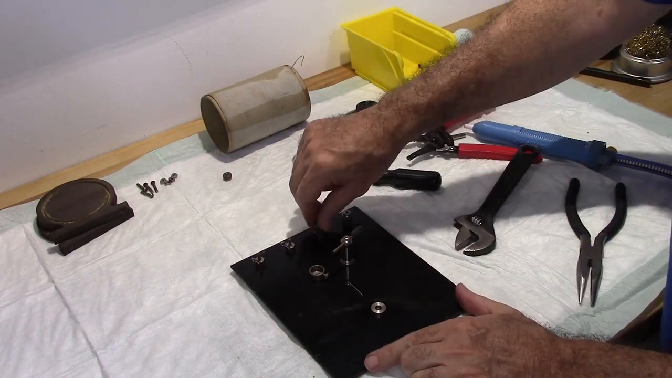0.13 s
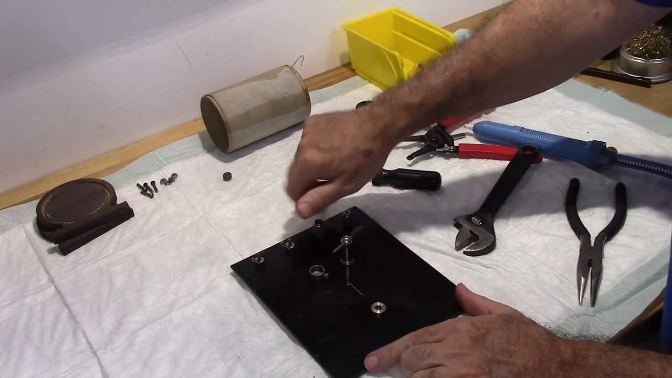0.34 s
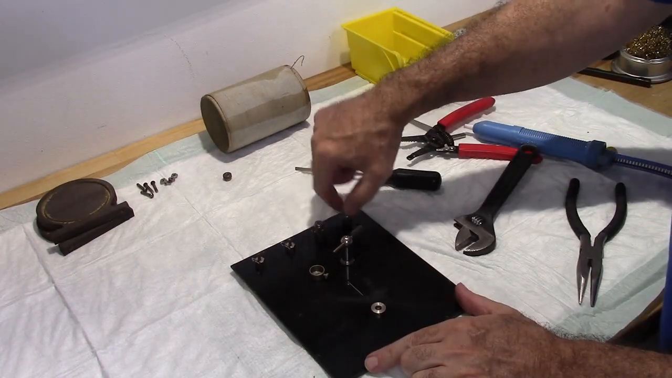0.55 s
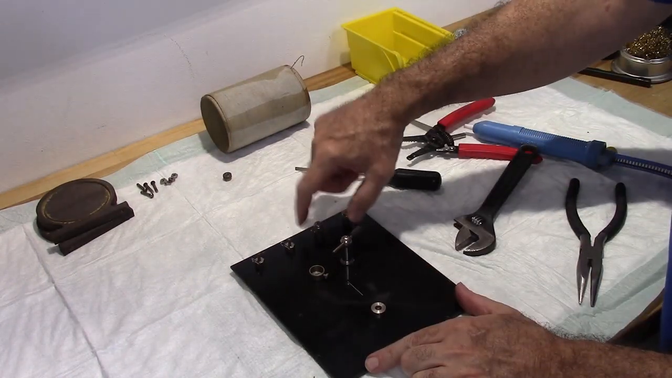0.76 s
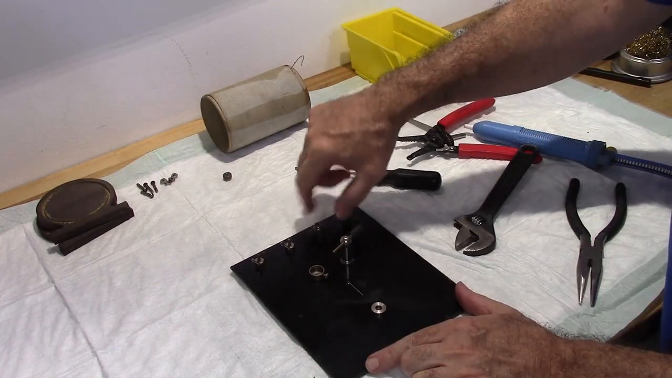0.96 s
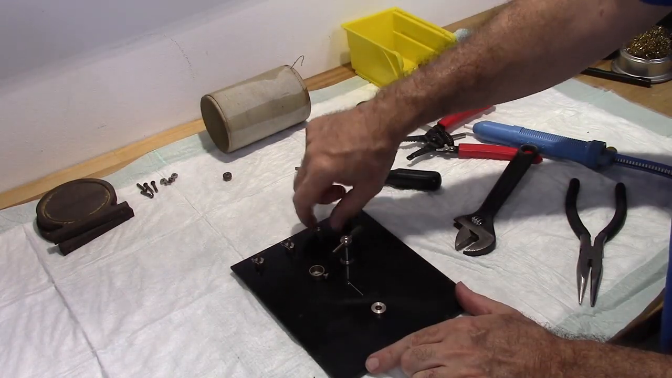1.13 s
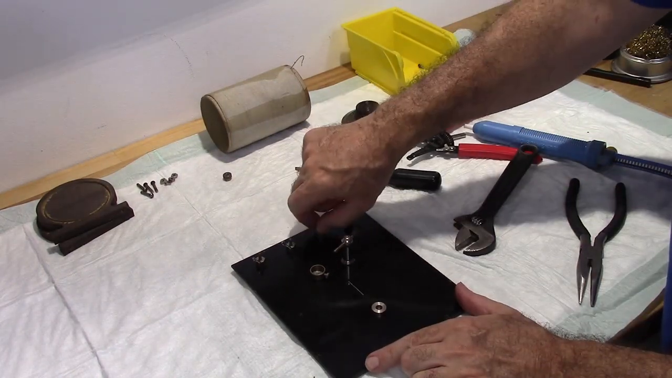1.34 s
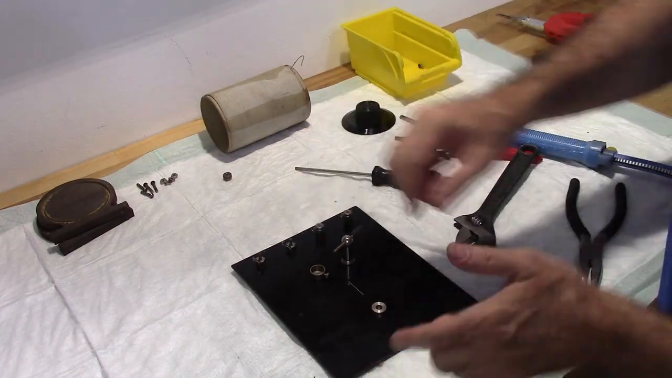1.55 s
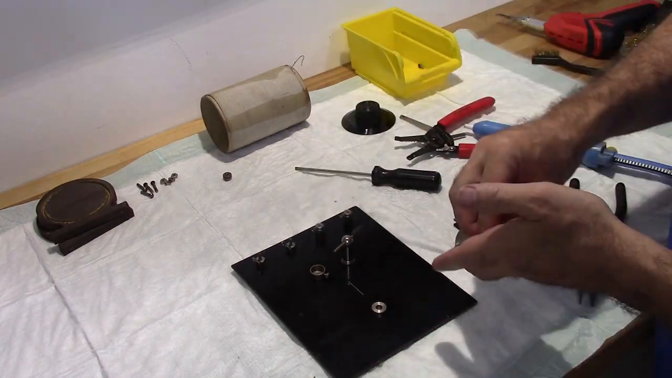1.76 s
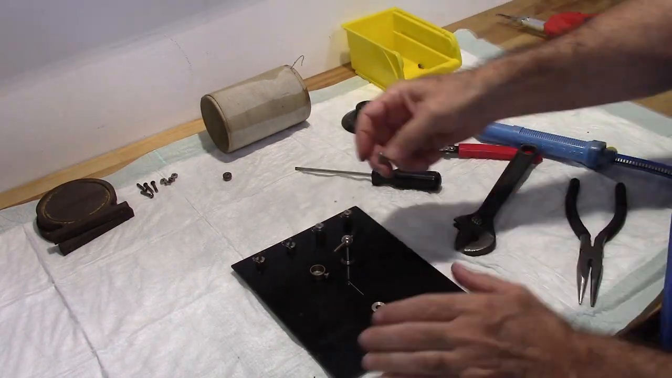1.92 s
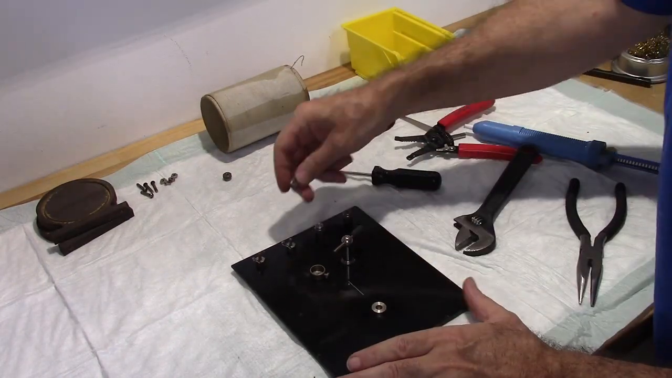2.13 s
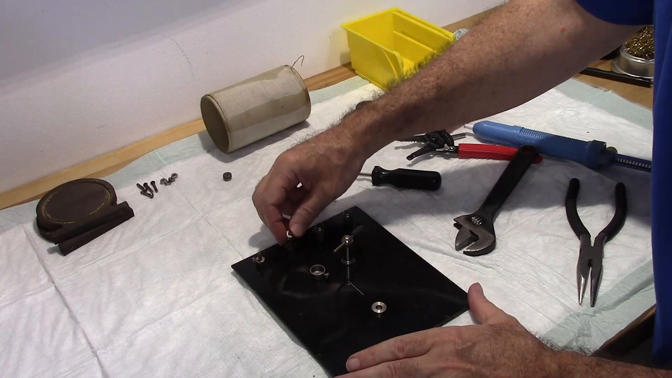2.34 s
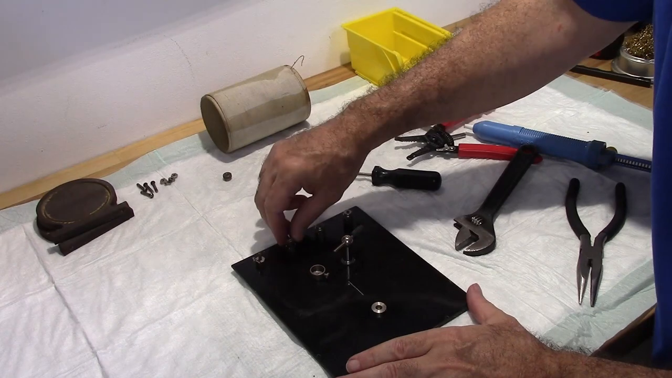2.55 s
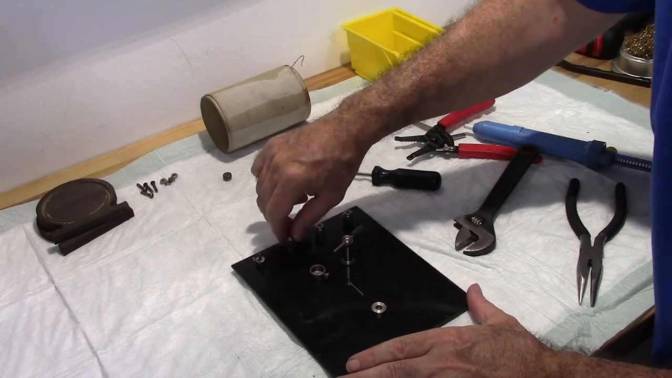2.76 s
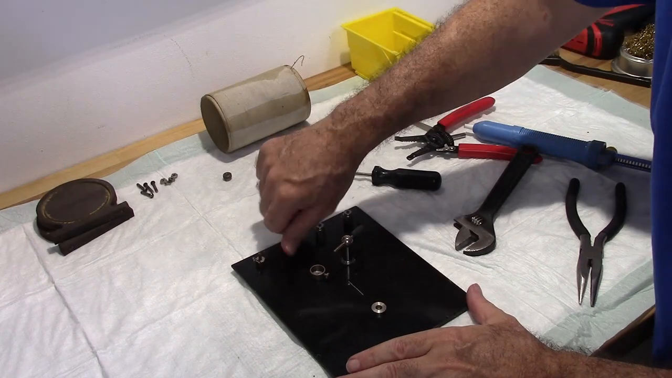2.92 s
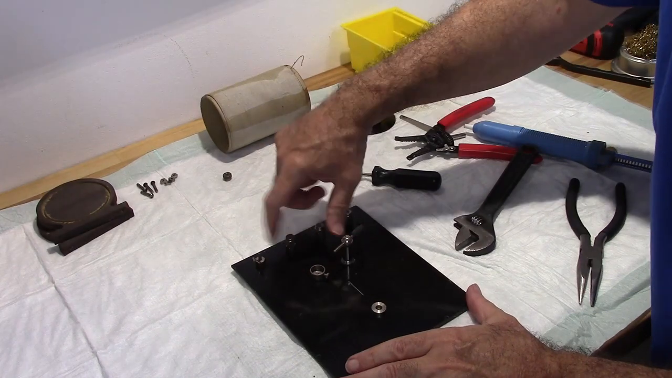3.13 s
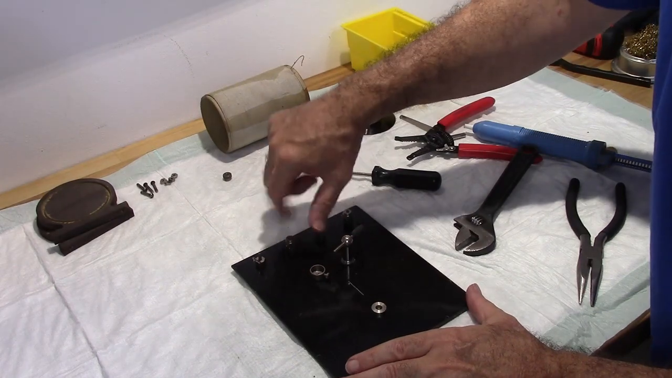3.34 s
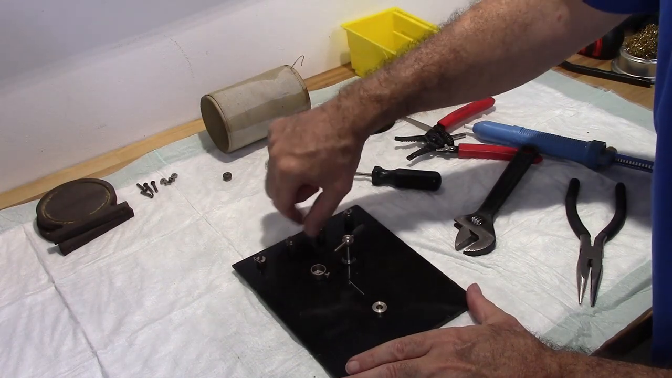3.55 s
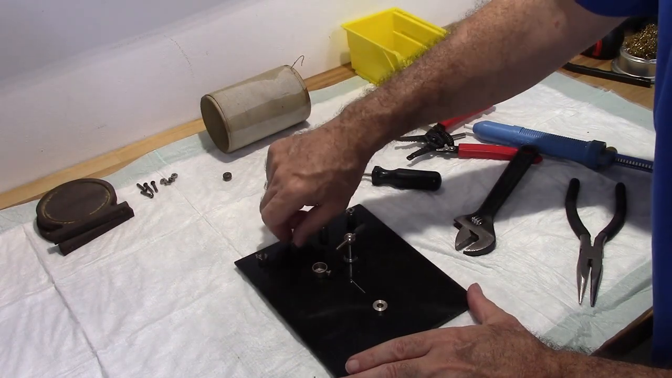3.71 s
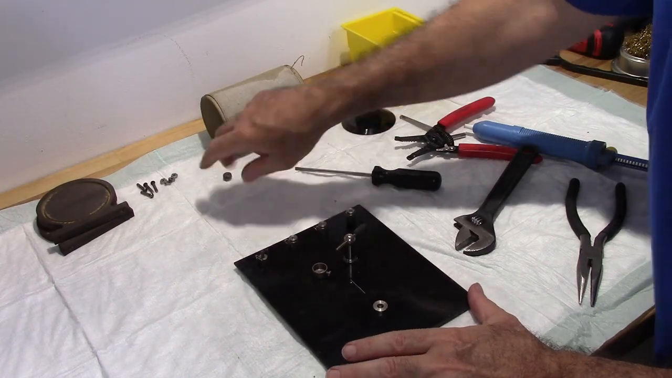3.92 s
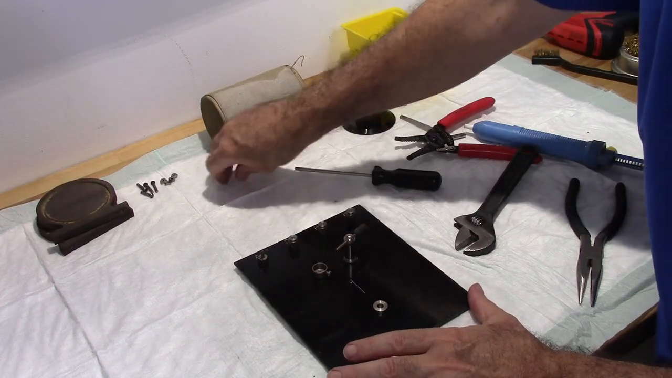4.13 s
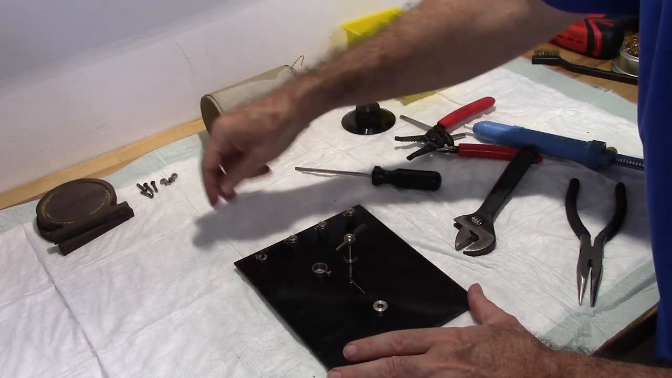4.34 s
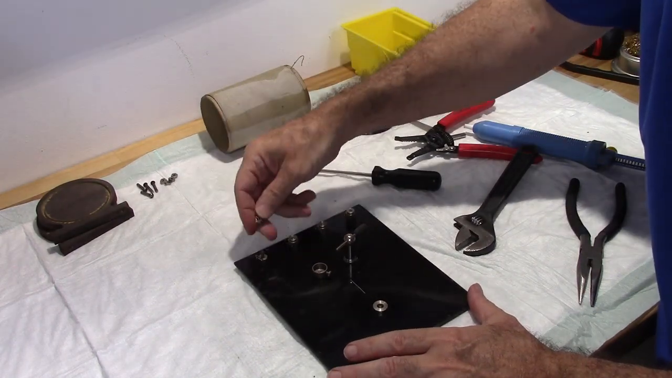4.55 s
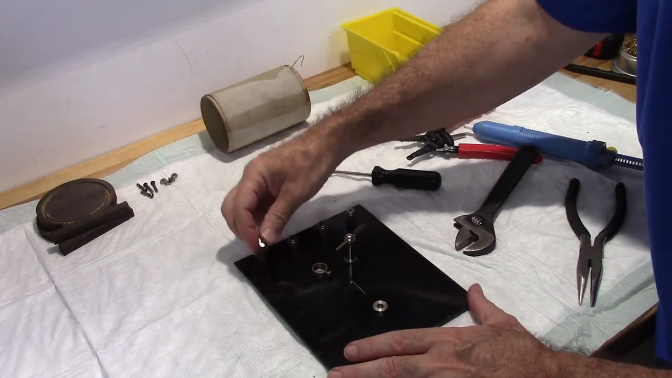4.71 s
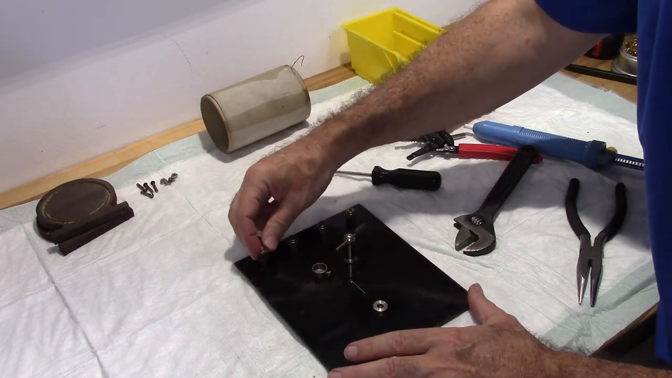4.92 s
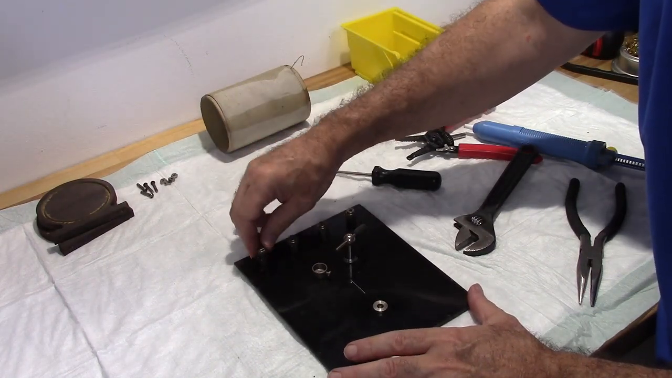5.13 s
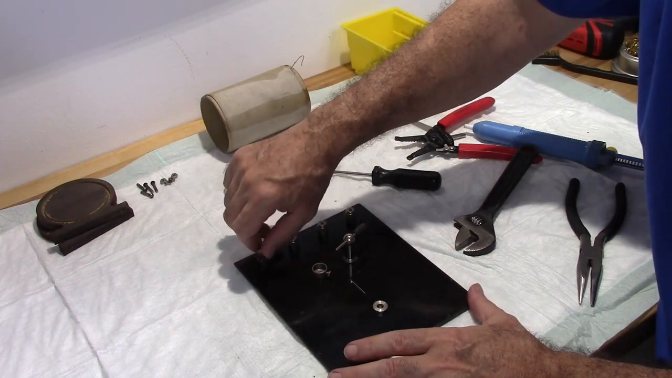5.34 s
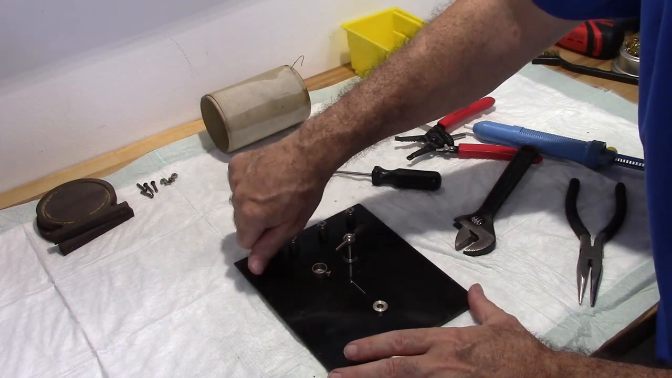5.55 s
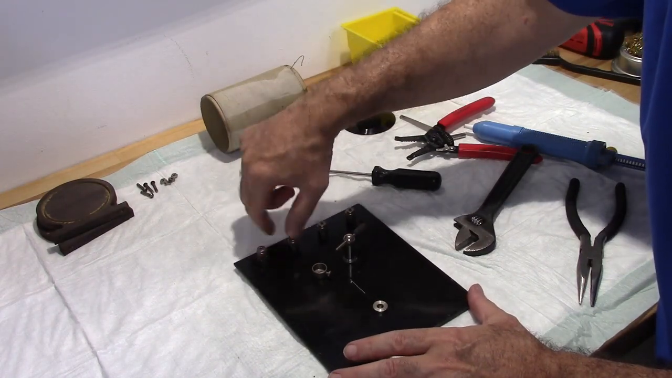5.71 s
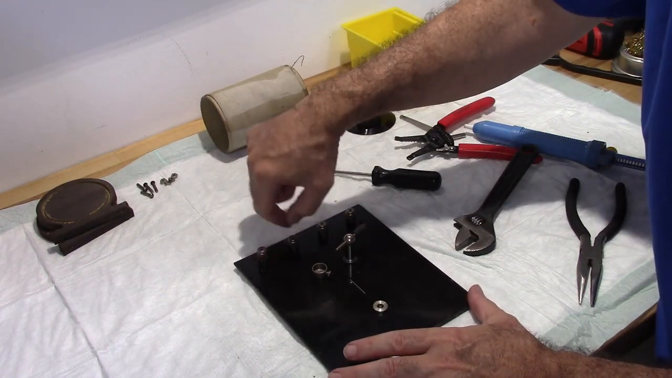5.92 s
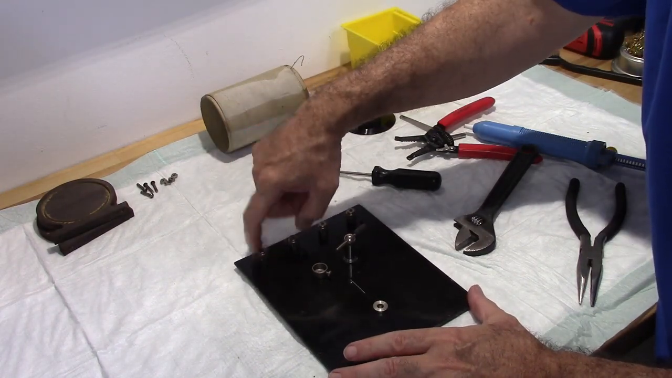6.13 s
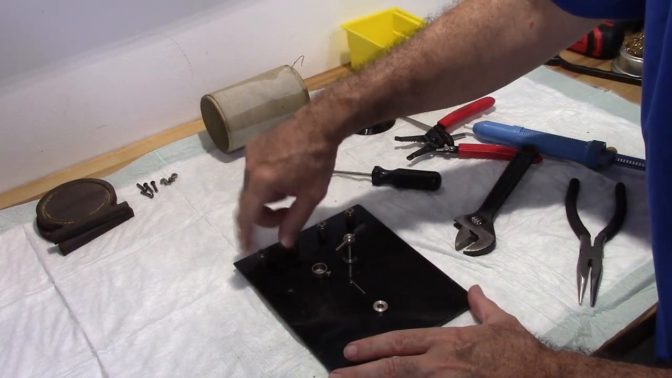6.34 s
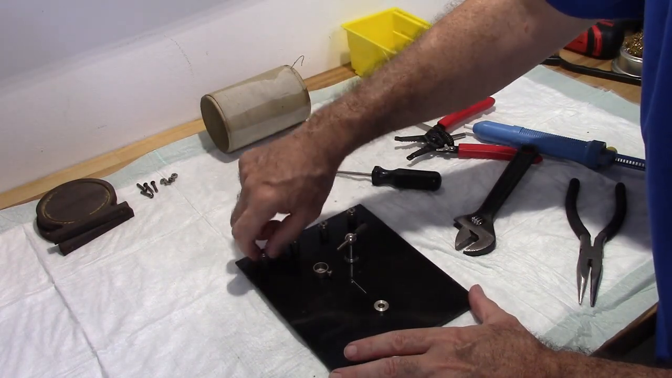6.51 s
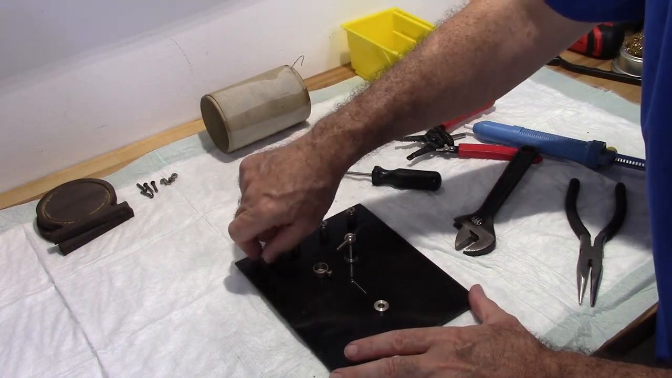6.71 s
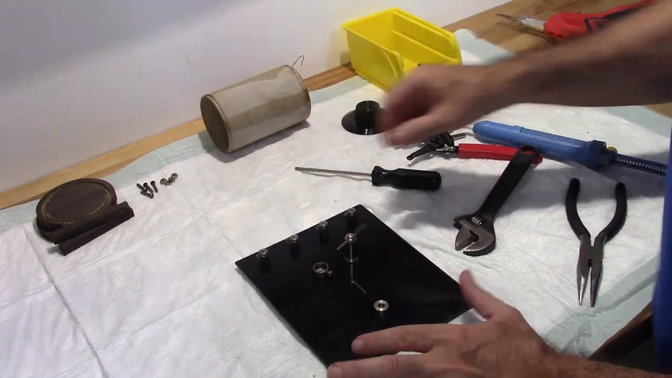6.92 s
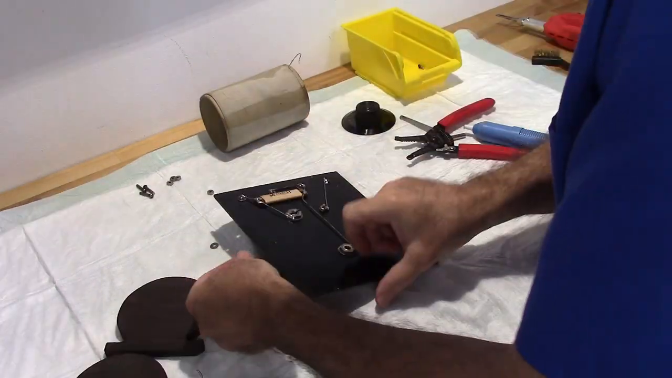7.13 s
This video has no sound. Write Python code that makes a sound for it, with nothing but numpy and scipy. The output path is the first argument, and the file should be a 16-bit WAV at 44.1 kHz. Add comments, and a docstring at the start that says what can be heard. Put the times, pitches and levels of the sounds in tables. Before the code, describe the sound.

Close fingernail ticks and brief bright rattles of little nuts spinning on their threads, in three bursts with light handling taps between.

```python
"""Light finger touches, then small nuts flicked down their screws, close to a stereo microphone.
The screws stand on a plastic plate lying on a padded workbench. Each flick is a tick of the
fingernail, a short spin on the thread and a rattle of quick contacts that ring in plate and nut.
More touches, soft bumps of the bench, sleeve rustle and the hush of a small room fill the pauses."""
import sys
import numpy as np
from scipy import signal
from scipy.io import wavfile

SR = 44100
rng = np.random.default_rng(int(sys.argv[2]) if len(sys.argv) > 2 else 0)


def transcribe(u):
    """Save the signal u as a 16-bit wav file named by the first command-line argument.

    u: samples, shape (n,) or (channels, n), limited to [-1, 1]; the rate is SR.
    q: integer samples, one column per channel.
    """
    v = np.clip(np.atleast_2d(u).T, -1, 1)
    q = np.round(v * 32767).astype(np.int16)
    wavfile.write(sys.argv[1], SR, q)


N = 320607

# fingers touch parts and pad: t/s of peak, level/dB, rise/(dB per 10 ms), brightness/dB, plate f/Hz
TOUCHES = [(0.014, -40.5, 45, -8, 1270), (0.1522, -49, 12, -13.5, 1300), (0.1985, -52, 16, -20, 1070),
           (0.2305, -48, 50, -26, 1030), (0.3035, -57.5, 6, -11, 1030), (0.679, -38, 40, -4.5, 2200),
           (0.938, -38, 80, 5, 1820), (1.448, -58.5, 25, -18.5, 1670), (1.477, -64, 15, -2, 1680),
           (1.5466, -47, 33, 0.5, 976), (2.038, -64, 12.5, 7.5, 1910), (2.1333, -71, 45, 14, 890),
           (2.67, -64, 29, -9, 1390), (2.705, -61.5, 11, -5, 1400), (2.762, -64, 19, -26, 1450),
           (2.7867, -47, 27, -12.5, 1540), (2.8863, -42, 21, -16, 1694), (2.954, -62.5, 12, -8, 1640),
           (2.977, -58, 6, -9.5, 1610), (3.441, -56, 80, -5, 1670), (3.679, -62, 7.5, -3.5, 980),
           (3.8005, -75.5, 14.5, 9.5, 1440), (3.868, -51.5, 39.5, -28, 1680), (3.9572, -71, 7, -0.5, 1050),
           (5.148, -56, 9.5, -18, 1050), (5.238, -60.5, 14, -18, 1200), (5.285, -64.5, 20.5, -7, 1033),
           (5.3217, -51.5, 14, -18, 1620), (5.361, -50.5, 36.5, -16, 1220), (5.4434, -63.5, 11, -4.5, 1380),
           (5.4703, -57.5, 14, -7.5, 1390), (5.534, -61.5, 10, -9.5, 1490), (5.807, -44, 38, -36, 1280),
           (6.7954, -60, 12, -19, 1280), (6.9049, -60, 28, -6, 1600), (6.9837, -62.5, 5, 1, 1280)]
# nail meets nut and sets it spinning: t/s, tick/dB, brightness/dB, spin/dB, bench bump/dB
NAIL_TICKS = [(0.432, -37, -10, -48, -51), (0.5568, -31.5, -2.7, -40, -39), (0.6845, -32.5, -3.5, -56, -37),
              (0.797, -45, -21, -44, -38), (0.9149, -41, 3, -44.5, -37.5), (1.0419, -41.5, 10, -42.5, -46),
              (2.3729, -37, 4.5, -81.5, -51.5), (3.065, -37, 17, -46.5, -50), (3.1847, -34.5, 15, -44, -51),
              (3.3, -35.5, 5, -42.5, -41.5), (3.419, -32, -3, -50.5, -44), (3.533, -34, 5, -44.5, -47),
              (4.7955, -42.5, -5, -69, -64.5), (5.6861, -61, -12, -45, -43), (5.8115, -32, -4, -39.5, -39),
              (5.917, -48, -45, -54, -47), (6.035, -58, -9, -46.5, -45), (6.15, -37.5, -3, -40.5, -37.5),
              (6.2642, -36.5, -7, -65, -40.5), (6.383, -33, -24, -53, -41.5)]
# the nut chatters on the thread, one row per tick: t/s of peak, level/dB, rise and fall/(dB per 10 ms),
# brightness/dB, plate flex/dB, plate f/Hz, nut f/Hz
RATTLES = [(0.4753, -35.5, 13, 17, -6, -21, 1240, 2530), (0.5818, -33.5, 16, 16, 4, -23, 2030, 2600),
           (0.7097, -25.5, 16.3, 17, 1, -21, 1630, 3200), (0.8306, -24.5, 29, 15.8, 2, -20.5, 1510, 2500),
           (0.9439, -23.5, 46, 14, 3.5, -21, 1820, 2830), (1.0581, -20.5, 58, 19, 1, -25, 1850, 2970),
           (2.4329, -32, 25, 16.3, -10.5, -21, 1640, 3260), (3.109, -32.5, 18, 11.1, 3, -18.5, 1740, 4430),
           (3.216, -28.5, 15.3, 15.4, 3, -19.5, 1760, 3700), (3.33, -26, 23, 14.7, 7, -16.5, 1660, 2480),
           (3.4475, -22.5, 39, 13.5, 7.5, -14, 1650, 2420), (3.5483, -26.5, 36, 24, 1, -33, 1374, 2440),
           (4.843, -31.5, 44.5, 20, -18, -23, 1255, 2570), (5.7175, -38, 10, 14, -13.5, -16, 1340, 2960),
           (5.8346, -36.5, 24, 20, 11, -11, 1400, 3000), (5.9414, -25.5, 23, 16.8, -0.5, -17.5, 1940, 2500),
           (6.0554, -25.5, 41, 16, 7, -12, 1660, 2500), (6.1729, -24, 67, 15.3, 4, -10, 1380, 3100),
           (6.286, -25, 24, 19, 3, -8, 1820, 2630), (6.4091, -26.5, 60, 16.2, -6, -21, 1430, 2640)]


def from_db(db):
    """Decibels to gain."""
    return 10 ** (np.asarray(db) / 20)


def unit_rms(x):
    """Scale to rms 1."""
    return x / np.sqrt(np.mean(x ** 2) + 1e-20)


def at_hz(points, hz):
    """Read a curve on a log-frequency axis."""
    freqs, values = np.transpose(points)
    return np.interp(np.log(hz), np.log(freqs), values)


def band(x, low_hz, high_hz, order=2):
    """Butterworth band-pass."""
    sos = signal.butter(order, [low_hz, min(high_hz, .45 * SR)], "band", fs=SR, output="sos")
    return signal.sosfilt(sos, x)


def drift(rate_hz):
    """A slow random wander of rms 1."""
    pole = np.exp(-80 * np.pi * rate_hz / SR)
    slow = signal.lfilter([1], [1, -2 * pole, pole * pole], rng.standard_normal(N // 40 + 2002))[2000:]
    return np.interp(np.arange(N) / 40, np.arange(len(slow)), unit_rms(slow))


def banded_noise(spectrum, flicker_db):
    """Stereo noise of rms 1 in half-octave bands, each with its own level, flicker and width."""
    likeness = [(60, 1), (180, 0.56), (550, 0.66), (1650, 0.19), (4970, 0.32), (15000, 0.82)]   # between the channels: f/Hz, correlation
    out, edges = 0, 22 * 2 ** np.arange(0, 10, .5)
    white = rng.standard_normal((2, 2, N))
    for k, (low, high) in enumerate(zip(edges, edges[1:])):
        hz = np.sqrt(low * high)
        if spectrum[0][0] < hz < spectrum[-1][0]:
            mid, side = band(white[k % 2], low, high)
            alike = at_hz(likeness, hz)
            gain = from_db(at_hz(spectrum, hz) + flicker_db * drift(3.8))
            out = out + gain * (np.sqrt(1 + alike) * mid + np.sqrt(1 - alike) * side * [[1], [-1]])
    return unit_rms(out)


def room_and_sleeves():
    """Low room tone all around the microphone, and the brighter rustle of sleeves."""
    levels = [(0, -60.5, -65.5), (1.3, -61.5, -67), (2.1, -61, -65), (3.75, -62, -66.5), (5.5, -61.5, -67),
              (6.6, -62, -68.5), (7.0, -59.5, -62.5), (7.27, -62.5, -61.5)]   # t/s, room tone/dB, rustle/dB
    room_spectrum = [(15, -51), (25, -23.5), (161, -5.5), (231, -4), (271, -4.5), (413, -4), (447, -2),
                     (616, -10), (1120, -11), (1290, -18), (1520, -22), (3000, -35), (3900, -59.5),
                     (6600, -120)]   # f/Hz, density/dB
    sleeve_spectrum = [(590, -26.5), (1000, -3), (1490, -3), (1640, 0), (2410, -2), (3010, -1.5),
                       (10100, -12.5), (15200, -23.5), (16500, -39)]   # f/Hz, density/dB
    times, room_db, sleeve_db = np.transpose(levels)
    t = np.arange(N) / SR
    room = from_db(np.interp(t, times, room_db)) * banded_noise(room_spectrum, flicker_db=2)
    sleeves = from_db(np.interp(t, times, sleeve_db)) * banded_noise(sleeve_spectrum, flicker_db=.3)
    return room + sleeves


def add_swell(strengths, s, rise, fall, levels_db, hold_s=0.):
    """Shake all five parts with one round-topped swell; rise and fall are in dB per 10 ms."""
    quickness = [.8, 1, 1.05, 1.15, 1.3]   # slope factor per part: the higher it rings, the shorter it answers
    at = np.arange(max(round((s - .12) * SR), 0), min(round((s + hold_s + .15) * SR), N))
    since = at / SR - s
    late = np.maximum(since - hold_s, np.minimum(since, 0))
    rise_db = np.clip(-100 * rise * since, -200, 200)
    fall_db = np.clip(100 * fall * late, -200, 200)
    shape = np.minimum(2 / (from_db(rise_db) + from_db(fall_db)), 1.3)
    strengths[:, at] += from_db(levels_db)[:, None] * shape ** np.array(quickness)[:, None]


def finger_shaking():
    """How hard touches, ticks, spins and rattles shake each part at each moment."""
    # per part (flex, plate, nut, bright ring, top): offset/dB, and share of the brightness it follows
    touch_parts, tick_parts = [-13.5, 0, .9, .5, -10], [-18, -1.5, 1, -.5, -14.5]
    spin_parts, rattle_parts = [-20.5, -3.5, -5, -12, -24.5], [-2.5, -1.5, 3.5, .5, -14]
    follows = np.array([0, .019, .52, .87, 1])
    strengths = np.zeros((5, N))
    for s, db, rise, bright, _ in TOUCHES:
        add_swell(strengths, s, rise, fall=2.1 * rise, levels_db=db + bright * follows + touch_parts)
    for (s, db, bright, spin_db, _), (rattle_s, *_) in zip(NAIL_TICKS, RATTLES):
        add_swell(strengths, s, rise=400, fall=36, levels_db=db + bright * follows + tick_parts)
        # the nut runs freely until it starts to chatter, coloured a little like the tick
        spin_levels = spin_db + .2 * bright * follows + spin_parts
        add_swell(strengths, s, rise=45, fall=28, levels_db=spin_levels, hold_s=rattle_s - s)
    for s, db, rise, fall, bright, flex_db, *_ in RATTLES:
        rattle_levels = db + bright * follows + rattle_parts + [flex_db, 0, 0, 0, 0]
        add_swell(strengths, s, rise, fall, rattle_levels)
    return strengths


def grip_pitches():
    """Each part's favoured f/Hz: plate and nut change at each tick, the plate briefly at a touch."""
    tick_times = np.array(NAIL_TICKS)[:, 0]
    flick = np.maximum(np.searchsorted(tick_times, np.arange(N) / SR) - 1, 0)
    plate_hz, nut_hz = np.array(RATTLES)[flick, -2:].T
    for s, *_, hz in TOUCHES:
        plate_hz[max(round((s - .012) * SR), 0):round((s + .015) * SR)] = hz
    return [590, plate_hz, nut_hz, 7900, 11800]


def ring_part(shaking, favoured_hz, low_hz, high_hz, body_db, lift_db, modes, wander_db):
    """A part rings in modes of wandering level over a broad body; the grip lifts those near one pitch."""
    drive = np.vstack([signal.unit_impulse(N), shaking])   # the impulse gives the part's own gain
    out = from_db(body_db) * drive
    for k, (hz, width_hz, db) in enumerate(modes):
        radius = np.exp(-np.pi * width_hz / SR)
        gain = (1 - radius ** 2) / 2
        feedback = [1, -2 * radius * np.cos(2 * np.pi * hz / SR), radius ** 2]
        mode = signal.lfilter([gain, 0, -gain], feedback, drive + 1e-18)
        closeness = np.exp(-(np.log(hz / favoured_hz) / .09) ** 2)
        mode[1:] *= from_db(lift_db * closeness + wander_db * drift(8.6))
        out += (-1) ** k * from_db(db) * mode
    out = band(out, low_hz, high_hz, order=4)
    return out[1:] / np.sqrt(np.sum(out[0] ** 2))


def nuts_and_plate():
    """Thousands of tiny uneven contacts a second shake the parts; the nut keeps settling afterwards in a fading
    chatter."""
    # the five ringing parts: low f/Hz, high f/Hz, body/dB, lift/dB, modes (f/Hz, width/Hz, level/dB)
    flex = (210, 720, -5.5, 3.1, [(305, 42, -5), (363, 60, -8.5), (466.4, 69, -4.5), (594, 35, 3),
            (672, 43, -7)])
    plate = (950, 2400, -5, 11, [(1140, 79, -4.5), (1144, 45, 0.5), (1433, 100, 0), (1429, 80, 2),
             (1652, 120, -7.5), (1821, 100, -0.5), (1824, 200, -13), (2236, 120, -2)])
    nut = (2000, 5850, -4.5, 4, [(2560, 47, -5.5), (2770, 100, 2), (2958, 150, -1), (3360, 130, 2.5),
           (3650, 250, -6), (4340, 190, 4), (5360, 67, -12.5)])
    bright_ring = (6300, 9900, -0.38, 3, [(6300, 330, -13), (7840, 120, -1), (7920, 300, -1),
                   (8450, 210, 0.5), (8850, 130, -11), (9500, 150, -7), (10300, 300, -13)])
    top = (10800, 13400, -6, 0, [(11800, 500, -6), (12300, 500, -6)])
    settling_tails = [(-6, .2, -23.5), (-11, 0.16, -31.5), (-9.5, 0.13, -19.5), (-18.5, 0.17, -16),
                      (-15.5, 0.065, -18)]   # each part's settling tail: tail/dB, t60/s, stereo side/dB
    contacts_per_s = 8000
    sizes = from_db(5.2 * np.minimum(rng.exponential(1, N), 3.5))
    contacts = unit_rms(sizes * (rng.random(N) < contacts_per_s / SR))
    # one firm click for each nail tick, each touch and the height of each rattle
    contacts[[round(s * SR) for s, *_ in [*NAIL_TICKS, *RATTLES, *TOUCHES]]] = 5.5
    out = np.zeros((2, N))
    parts = zip([flex, plate, nut, bright_ring, top], finger_shaking(), grip_pitches(), settling_tails)
    for part, strength, favoured_hz, (tail_db, t60, side_db) in parts:
        retained = from_db(-120 / (t60 * SR))   # share of the settling energy left after one sample
        energy = signal.lfilter([1 - retained], [1, -retained], strength ** 2 + 1e-18)
        tail = from_db(tail_db) * np.sqrt(energy)
        diffuse = rng.standard_normal((2, N))
        mid = contacts * rng.choice([-1, 1], N) * strength + tail * diffuse[0]
        # reflections reach the two sides of the microphone unalike
        side = from_db(side_db) * (strength + 1.5 * tail) * diffuse[1]
        mid, side = ring_part(np.array([mid, side]), favoured_hz, *part, wander_db=2.5)
        out += mid + side * [[1], [-1]]
    return out


def pings():
    """Dying sines: each touch taps the plate at its own pitch, and a few contacts leave a mode ringing."""
    lingering_modes = [(1.062, 2870, -50, .34), (4.846, 1290, -35.5, 0.093), (5.36, 1385, -46, 0.082),
                       (5.47, 1390, -49.5, 0.14), (6.409, 1240, -25.5, 0.076), (6.411, 2880, -42, 0.053)]   # t/s, f/Hz, level/dB, t60/s
    tap_lift_db, tap_t60_s = 4, .027
    taps = [(s, hz, db + tap_lift_db, tap_t60_s) for s, db, *_, hz in TOUCHES]
    out, t = np.zeros(N + SR), np.arange(SR // 2) / SR
    for s, hz, db, t60 in [*lingering_modes, *taps]:
        out[round(s * SR):][:len(t)] += from_db(db - 60 * t / t60) * np.sin(2 * np.pi * hz * t)
    return out[:N]


def bench_bumps():
    """The padded bench gives a brief low ring just after each tick, and at a few other moments."""
    other_bumps = [(1.252, -52.5, 155), (1.527, -52, 105), (1.68, -50, 146.6), (1.965, -59, 200),
                   (2.43, -47.5, 133), (2.872, -52.5, 195), (3.651, -51, 169.4), (3.692, -40, 155.5),
                   (7.257, -48.5, 178)]   # t/s, level/dB, f/Hz
    bench_hz, lag_s, decay_s = 159, .0033, .004
    flick_bumps = [(s + lag_s, db, bench_hz) for s, *_, db in NAIL_TICKS]
    out, t = np.zeros(N), np.arange(N) / SR
    for s, db, hz in [*other_bumps, *flick_bumps]:
        at = slice(round(s * SR), round((s + .086) * SR))
        age = np.maximum(t[at] - s, 0)
        envelope = age / .0045 * np.exp(-age / decay_s)
        out[at] += from_db(db + 7) * envelope * np.sin(2 * np.pi * hz * age)
    return out


def soft_tones():
    """Three faint short tones swell and fade in the pauses."""
    tones = [(1.396, 0.12, 165.8, -56.5), (4.685, 0.042, 672, -54.5), (6.993, 0.13, 114.4, -58)]   # t/s, length/s, f/Hz, level/dB
    out, t = np.zeros(N), np.arange(N) / SR
    for s, length, hz, db in tones:
        arch = np.sin(np.pi * np.clip((t - s) / length, 0, 1)) ** .49
        out += from_db(db) * arch * np.sin(2 * np.pi * hz * t)
    return out


def scene():
    """The workbench close up, a hair left of centre, over the room tone."""
    background = room_and_sleeves()
    workbench = nuts_and_plate() + pings() + bench_bumps() + soft_tones()
    return workbench * from_db([[.15], [-.15]]) + background


def record(dry):
    """The loudest clicks are softly rounded; deep rumble and extreme treble are cut."""
    ceiling, low_cut_hz, stop_hz = .85, 25, 16800
    rounded = ceiling * np.tanh(dry / ceiling)
    low_cut = signal.butter(1, low_cut_hz, "high", fs=SR, output="sos")
    high_cut = signal.cheby2(14, 60, stop_hz, fs=SR, output="sos")
    return signal.sosfilt(high_cut, signal.sosfilt(low_cut, rounded))


dry = scene()
out = record(dry)
transcribe(out)
```